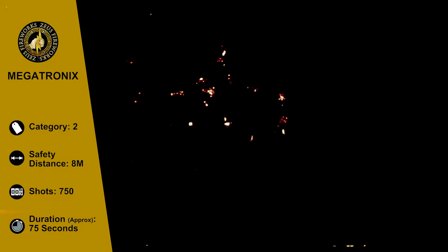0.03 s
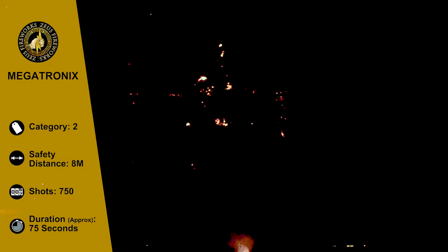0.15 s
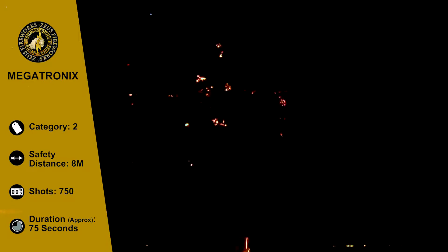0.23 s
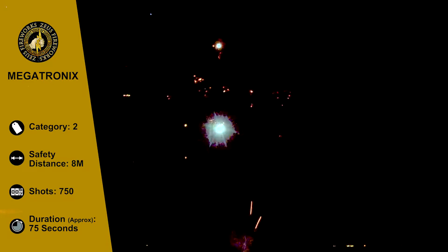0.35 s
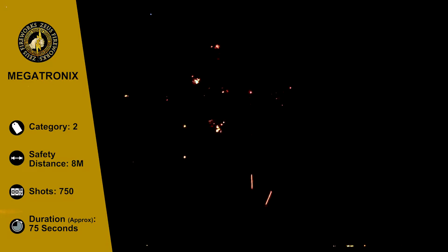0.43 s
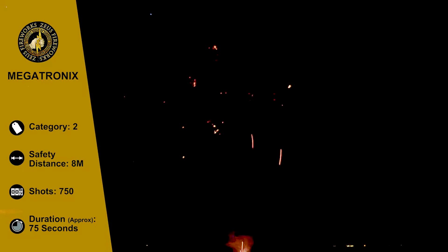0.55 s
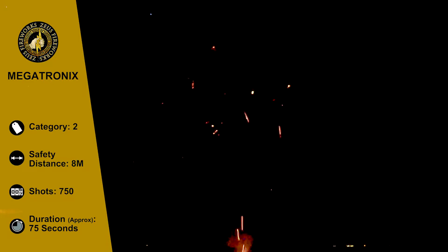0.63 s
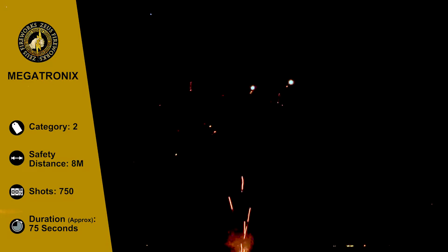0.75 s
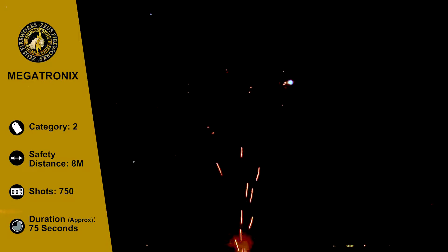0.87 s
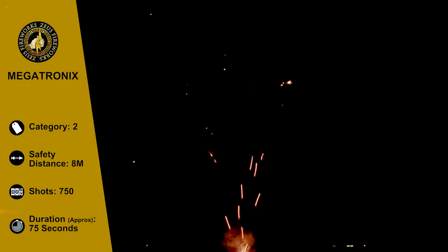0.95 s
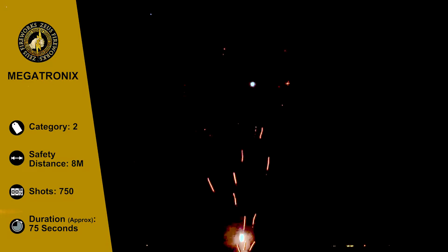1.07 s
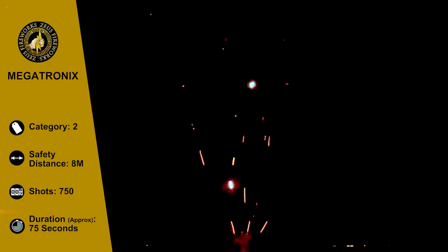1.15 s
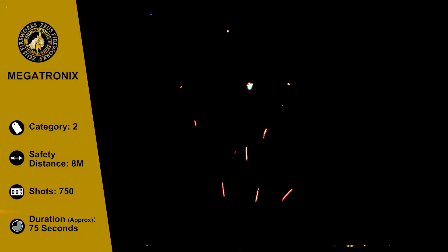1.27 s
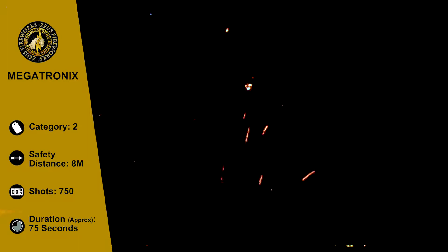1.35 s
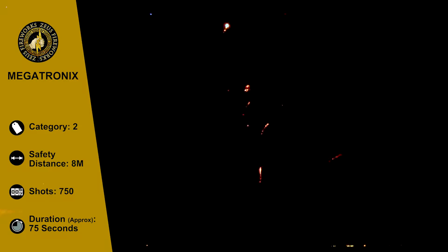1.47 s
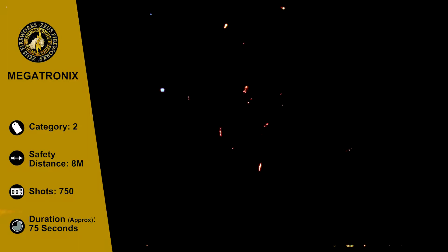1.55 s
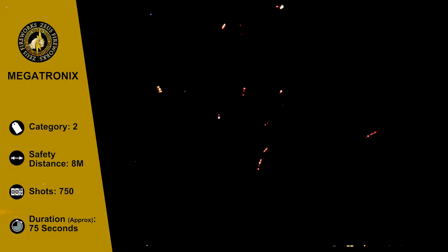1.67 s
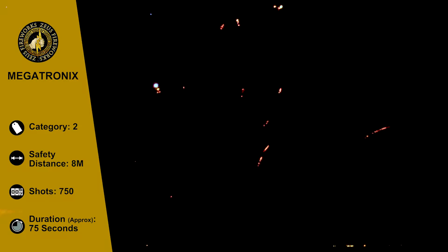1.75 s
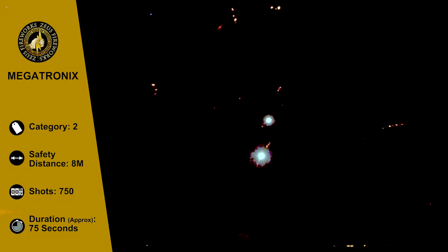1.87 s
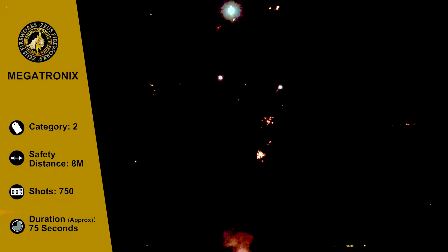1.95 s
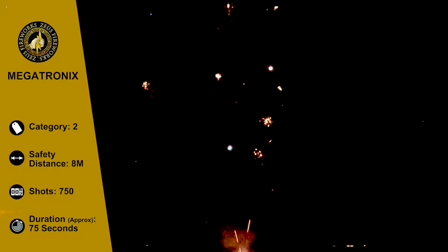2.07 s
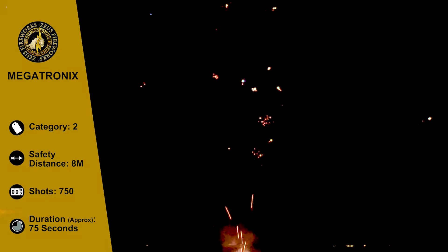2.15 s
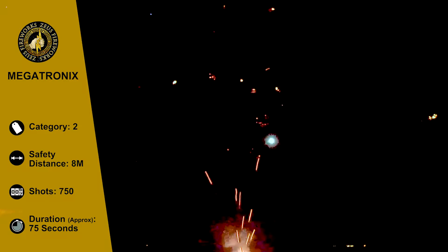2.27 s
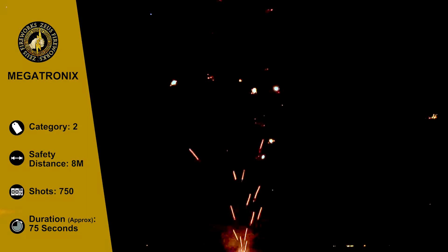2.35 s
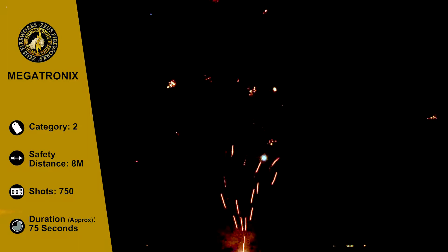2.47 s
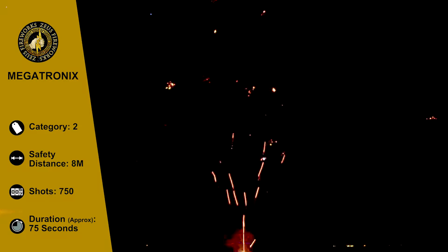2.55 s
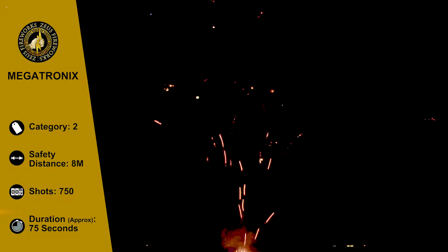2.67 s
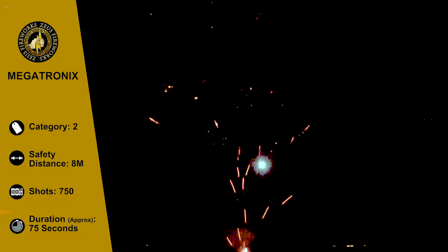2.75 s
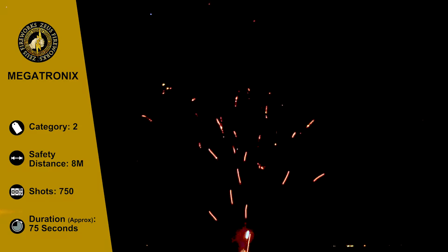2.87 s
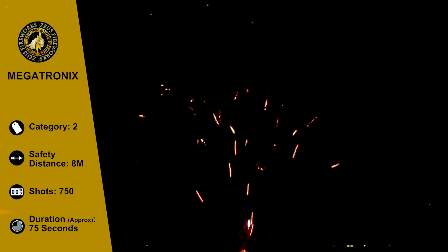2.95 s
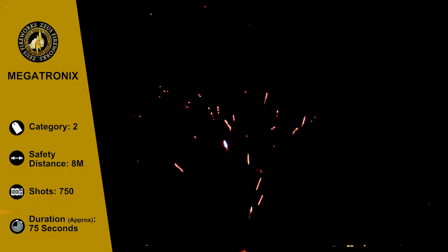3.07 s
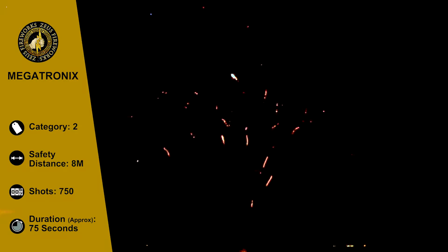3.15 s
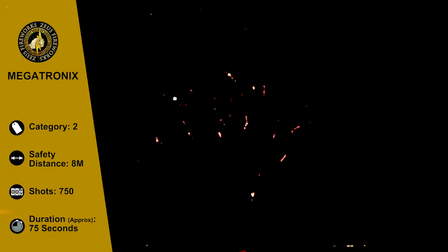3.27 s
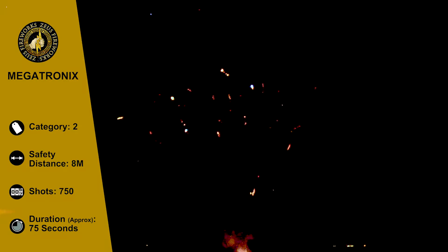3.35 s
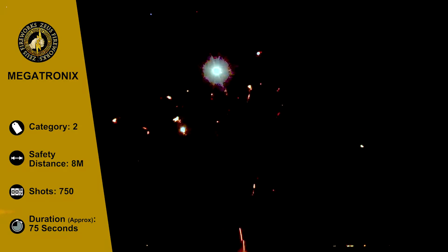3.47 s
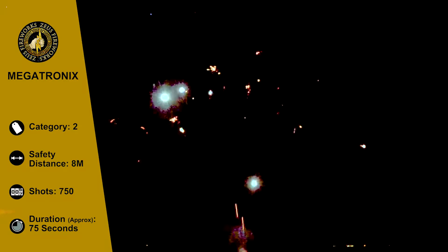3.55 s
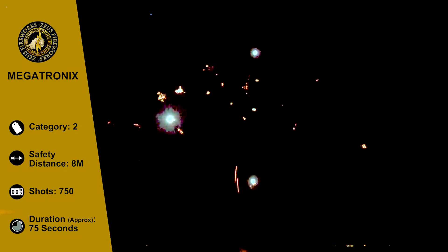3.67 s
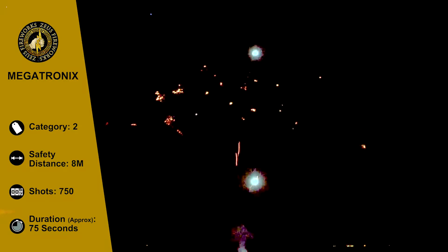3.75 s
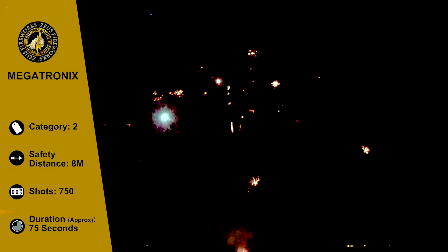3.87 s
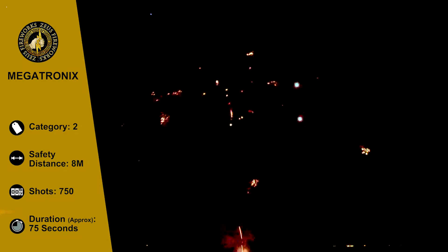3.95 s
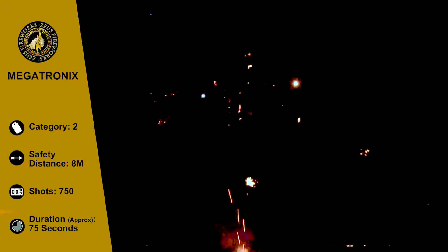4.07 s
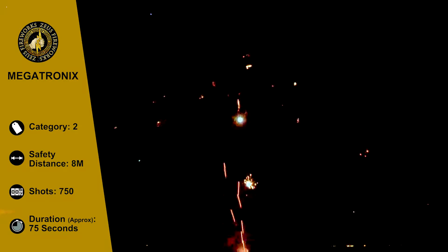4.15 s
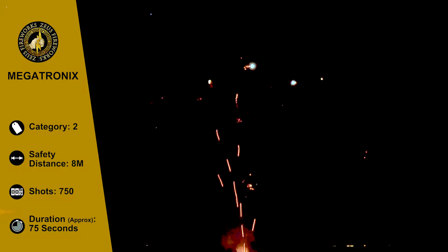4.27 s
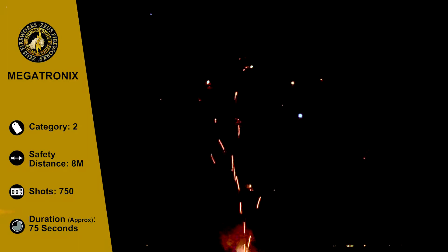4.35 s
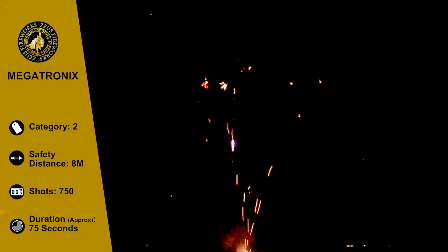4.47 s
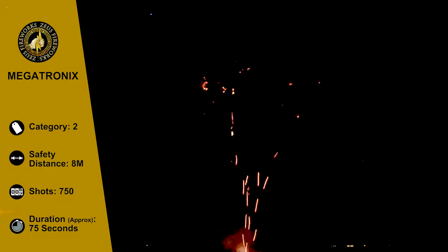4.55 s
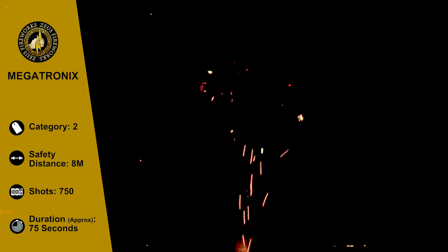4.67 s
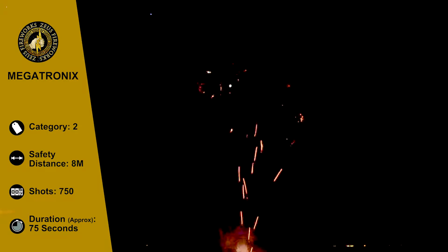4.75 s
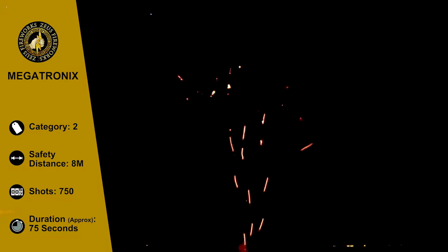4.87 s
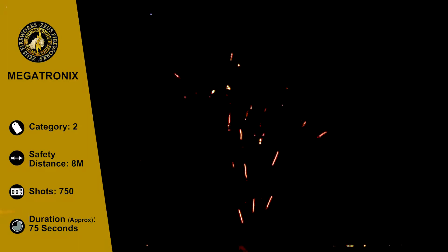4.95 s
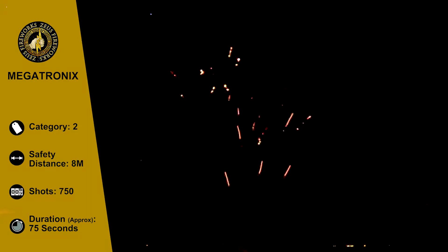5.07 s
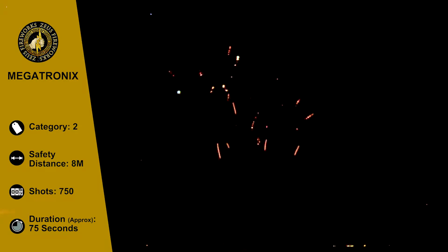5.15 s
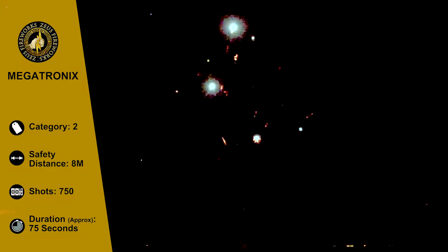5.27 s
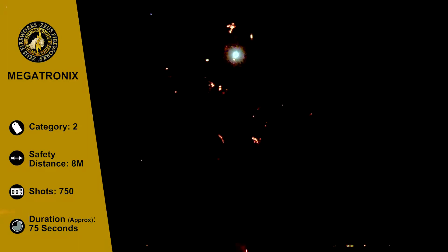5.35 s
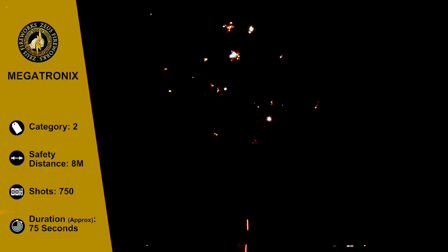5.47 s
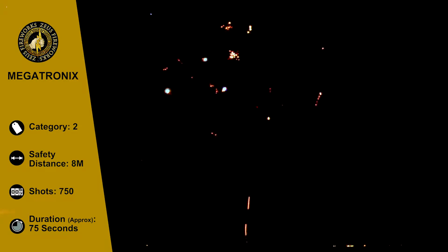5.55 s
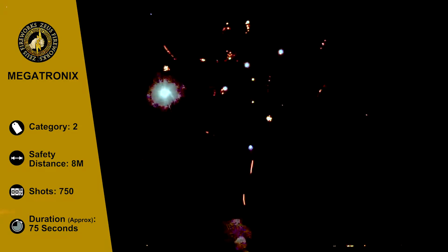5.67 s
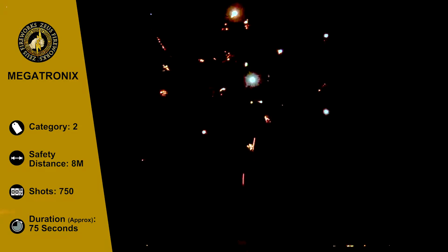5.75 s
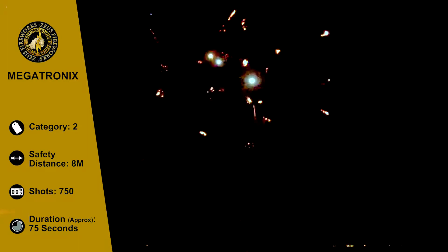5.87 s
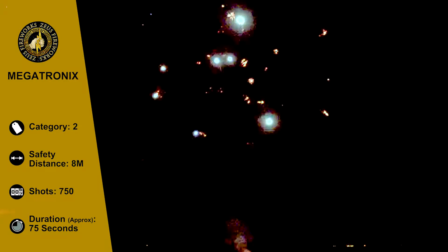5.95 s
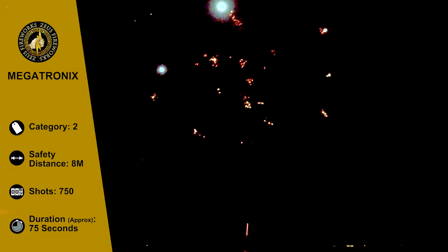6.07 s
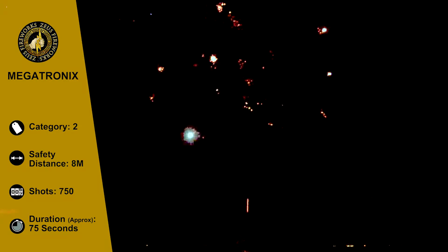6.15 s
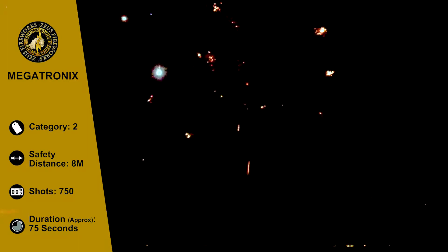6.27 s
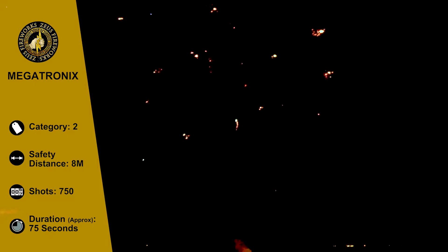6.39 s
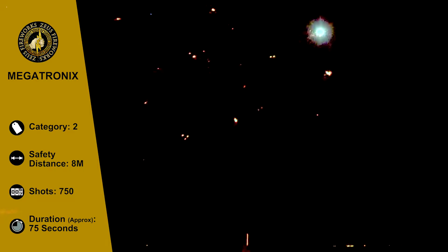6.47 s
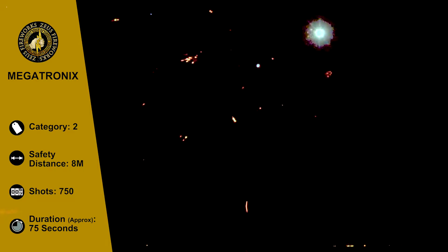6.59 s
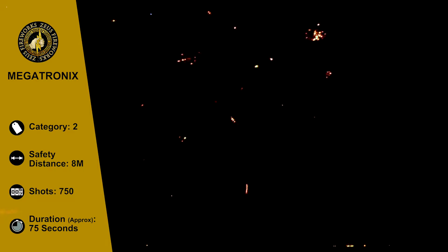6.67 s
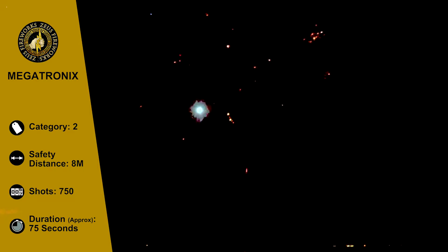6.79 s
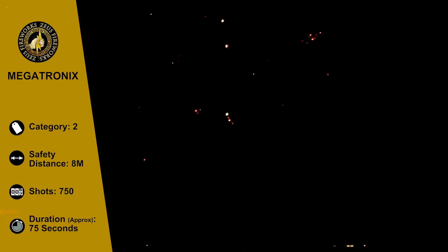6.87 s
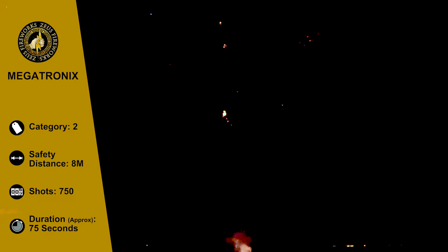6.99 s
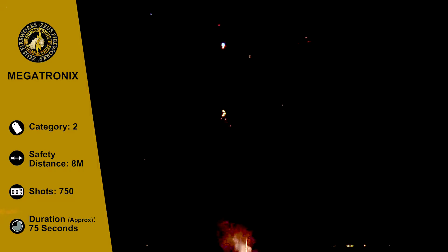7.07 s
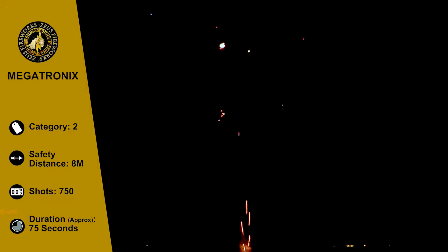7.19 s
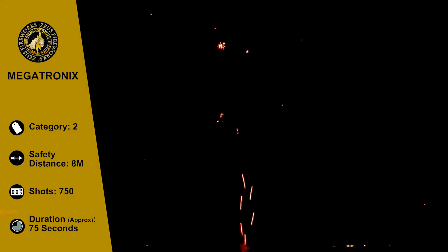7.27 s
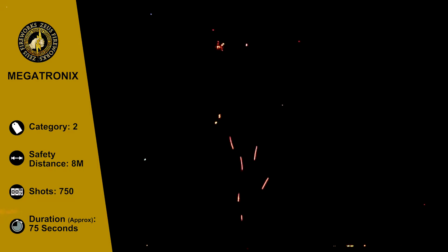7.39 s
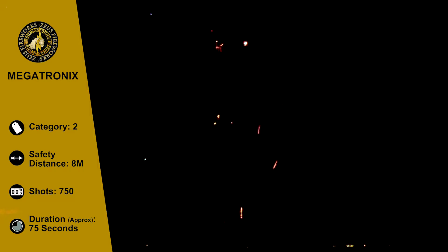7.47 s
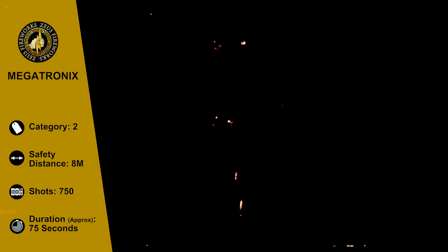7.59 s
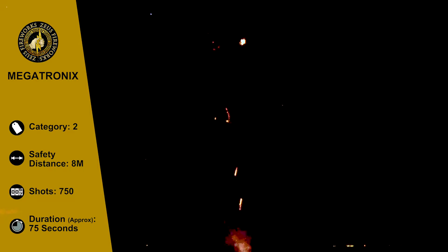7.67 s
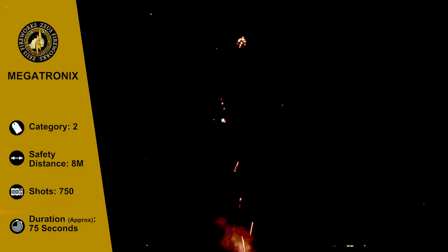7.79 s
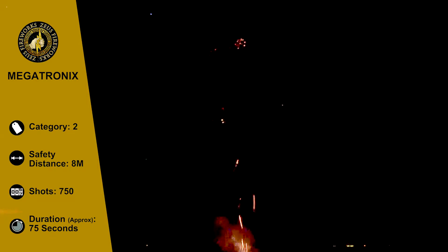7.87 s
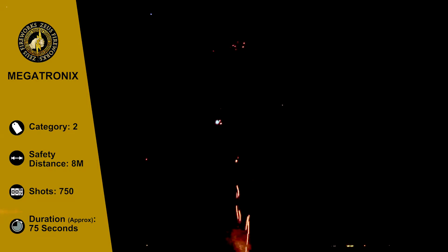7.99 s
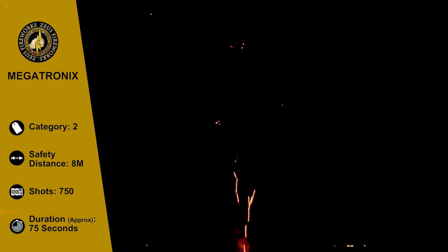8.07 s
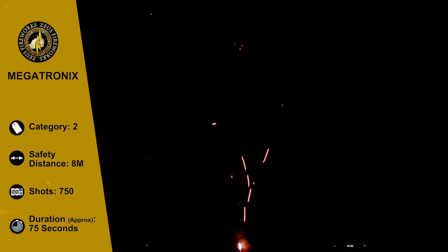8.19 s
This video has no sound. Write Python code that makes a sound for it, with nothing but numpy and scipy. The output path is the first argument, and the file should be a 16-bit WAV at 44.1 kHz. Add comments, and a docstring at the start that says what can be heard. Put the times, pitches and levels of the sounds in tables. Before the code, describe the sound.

Fireworks launch in rapid salvos with shrill, wavering whistles and sharp cracks bursting overhead in the open night air.

```python
"""Whistling comets, fired in salvos from a fireworks cake in an open field at night.
Each lift charge thumps; the whistle mix lights with a falling squeal and shrills for half a second,
wavering and sinking over the hiss of its jet. Spent comets burst overhead with sharp cracks.
Distant trees return a thin wash over low night rumble."""
import sys
import numpy as np
from scipy import signal
from scipy.fft import rfft, irfft
from scipy.io import wavfile
from scipy.ndimage import uniform_filter1d

SR = 44100
rng = np.random.default_rng(int(sys.argv[2]) if len(sys.argv) > 2 else 0)


def wav_out(sig):
    """Save sig, one row per channel (or a flat mono array), as 16-bit PCM at SR to the path in sys.argv[1]."""
    wavfile.write(sys.argv[1], SR, np.round(np.clip(np.atleast_2d(sig).T, -1, 1) * 32767).astype(np.int16))


N = 362943

# lift charges: start_s, level_db
LIFTS = [(0.33, -31.5), (0.37, -26), (0.687, -24), (0.728, -19.5), (0.765, -26), (0.79, -27.5),
         (0.836, -21), (0.87, -25), (0.905, -26.5), (0.95, -21.5), (0.998, -22.5), (1.02, -28), (1.05, -30),
         (1.102, -30), (1.126, -24), (1.172, -23.5), (1.203, -32), (2.115, -29), (2.156, -21), (2.197, -28),
         (2.242, -24), (2.294, -29), (2.328, -25), (2.35, -23.5), (2.394, -22), (2.423, -26),
         (2.438, -29.5), (2.484, -29), (2.518, -28), (2.563, -30), (2.599, -27), (2.647, -23), (2.696, -29),
         (2.754, -33), (2.783, -31), (2.824, -28.5), (2.862, -29), (2.89, -24), (2.938, -36), (2.986, -32),
         (3.552, -29), (3.589, -25), (4.029, -26), (4.088, -23), (4.137, -24), (4.208, -27), (4.246, -21.5),
         (4.297, -21.5), (4.333, -36), (4.395, -27), (4.429, -27), (4.453, -24), (4.486, -26), (4.535, -29),
         (4.558, -34), (4.584, -28), (4.61, -23.5), (4.634, -25.5), (4.7, -28), (4.755, -35), (4.782, -32),
         (4.815, -32), (4.86, -34), (4.909, -28), (4.954, -38), (5.506, -29), (5.591, -30), (6.116, -23),
         (6.56, -24), (7.181, -23), (7.22, -21), (7.246, -21), (7.277, -19.5), (7.322, -22), (7.346, -24),
         (7.864, -19.5), (7.891, -26.5), (7.917, -20), (7.943, -28), (7.99, -24), (8.014, -36),
         (8.043, -22), (8.081, -42), (8.127, -30), (8.195, -28.5)]
IGNITION_DELAY_S = .015


def amp(db):
    """dB to gain."""
    return np.exp(np.asarray(db) * np.log(10) / 20)


def rms_one(x):
    """Scale to rms 1."""
    return x / np.sqrt(np.mean(x ** 2) + 1e-20)


def drift(rate_hz, size):
    """Low-passed random wander, spread 1."""
    hop, settle = 20, 400
    pole = np.exp(-2 * np.pi * hop * rate_hz / SR)
    noise = rng.standard_normal(size // hop + settle + 2)
    slow = signal.lfilter([(1 - pole) ** 2], [1, -2 * pole, pole * pole], noise)[settle:]
    return np.interp(np.arange(size) / hop, np.arange(len(slow)), slow / np.sqrt((1 - pole) / 4))


def coloured(spectrum):
    """Steady noise of a given spectrum, rms 1."""
    hz, db = np.transpose(spectrum)
    bins_hz = np.maximum(np.fft.rfftfreq(N, 1 / SR), 1)
    gain = amp(np.interp(np.log(bins_hz), np.log(hz), db))
    return rms_one(irfft(rfft(rng.standard_normal(N)) * gain, N))


def butter(x, order, hz, kind="low"):
    """Butterworth filter."""
    return signal.sosfilt(signal.butter(order, hz, kind, fs=SR, output="sos"), x)


def fade(size, ramp_s):
    """Linear ramps at both ends."""
    return np.clip(np.minimum(np.arange(size), np.arange(size)[::-1]) / (ramp_s * SR), 0, 1)


def add(out, start_s, sound):
    """Mix in at start_s."""
    i = max(round(start_s * SR), 0)
    out[i:i + len(sound)] += sound[:N - i]


def whistle(hz, edge_db=0, partials=None, waver=.00396, jitter=.00309, flutter_db=2.5, rasp_db=2.0):
    """Burning tube: pitch wavers, partials flutter, level rasps. Edge trades half steps for overtones."""
    # tube partials, half steps from strong-weak burning cycles: multiple, level_db
    tube_partials = [(.5, -41), (1, -1.5), (1.5, -32), (2, -19.5), (2.5, -28), (3, -26), (3.5, -28.5),
                     (4, -40), (4.5, -45), (5, -42.5), (6, -50)]
    size = len(hz)
    wavering_hz = hz * (1 + waver * drift(20.5, size) + jitter * drift(72.7, size))
    phase = 2 * np.pi * (np.cumsum(wavering_hz) / SR + rng.random())
    tone = np.zeros(size)
    for multiple, level_db in partials or tube_partials:
        tilt_db = edge_db * ((multiple >= 2) - (multiple in (.5, 1.5)))
        swing_db = (1 if multiple == 1 else 2) * flutter_db * drift(25, size)
        tone += amp(level_db + tilt_db + swing_db) * np.sin(multiple * phase)
    return np.sqrt(2) * amp(rasp_db * drift(98, size)) * tone


def burn_edge_db(size):
    """The screech sharpens as the mix burns down the tube."""
    return np.linspace(-7, -.5, size)


def solo_comets(climb_s=.035, catch_db=-5, catch_s=.033, tumble_db=2, flick_hz=2900, flick_s=.016):
    """Single whistles climb to pitch, glide, tumble and end in a high flick. Returns sound, power."""
    # comets: lit_s, spent_s, first_hz, last_hz, level_db, tumble_hz, crest_s, tumble_pct
    comets = [(-.3, 0.084, 2684, 2260, -15.5, 2, .04, 0.33), (-.2, 0.216, 2490, 2467, -19, 11.7, .043, 2.5),
              (0.342, 0.799, 2733, 2706, -19, 6, .526, 1.6),
              (0.385, 0.801, 2651, 2516, -16.5, 3.36, .45, 1.24),
              (1.193, 1.627, 2483, 2238, -18.5, 3.55, 1.398, 0.78),
              (1.22, 1.631, 2635, 2529, -22.5, 8.6, 1.515, 2.5),
              (2.851, 3.312, 2706, 2832, -18.5, 6.3, 3.11, 0.49),
              (2.999, 3.566, 2500, 2213, -20.5, 4.87, 3.36, 1.08),
              (2.95, 3.443, 2450, 2421, -17.5, 3.2, 3.204, 2.9),
              (3.561, 4.048, 2745, 2494, -18.5, 6.2, 3.5, 1.23),
              (3.604, 4.003, 2598, 2437, -18.5, 6.2, 3.2, 1.44),
              (4.044, 4.449, 2705, 2579, -17, 8, 4.261, 1.27),
              (4.973, 5.425, 2760, 2484, -21, 8.3, 5.138, 2.37),
              (4.92, 5.402, 2578, 2399, -20.5, 8.34, 5.178, 1.66),
              (4.878, 5.376, 2465, 2324, -19, 9.7, 5.142, 1.25),
              (5.519, 6.006, 2670, 2480, -17.5, 11, 5.77, 1.78),
              (5.608, 6.124, 2572, 2284, -19.5, 13.5, 5.885, 1.53),
              (6.132, 6.546, 2636, 2450, -18, 14.4, 6.355, 1.63),
              (6.573, 6.977, 2624, 2373, -18.5, 14.8, 7, 1.27),
              (7.195, 7.681, 2735, 2342, -15, 14.1, 7.46, 1.11),
              (7.261, 7.668, 2710, 2507, -16.5, 4.7, 7.479, 1.06),
              (7.295, 7.698, 2602, 2400, -18, 9, 7.52, 1.93),
              (7.879, 8.23, 2632, 2481, -18, 14.2, 8.039, 1.5)]
    out, power = np.zeros(N), np.zeros(N)
    flick_t = np.arange(0, flick_s, 1 / SR)
    for lit_s, spent_s, first_hz, last_hz, level_db, tumble_hz, crest_s, tumble_pct in comets:
        t = np.arange(max(lit_s, 0), spent_s, 1 / SR)
        age_s = t - lit_s
        turn = 2 * np.pi * tumble_hz * (t - crest_s)
        tumble = tumble_pct / 100 * (np.cos(turn) - .29 * np.sin(2 * turn))   # skewed pitch swing
        flat = .08 * np.exp(-age_s / climb_s)
        hz = np.interp(t, [lit_s, spent_s], [first_hz, last_hz]) * (1 - flat + tumble)
        swing_db = tumble_db * np.cos(turn - 2 * np.pi * .2)   # level lags pitch
        gain = amp(level_db + catch_db * np.exp(-age_s / catch_s) + swing_db) * fade(len(t), .0073)
        add(out, t[0], gain * whistle(hz, burn_edge_db(len(t))))
        add(power, t[0], gain ** 2)
        rise_hz = flick_hz + (hz[-1] - flick_hz) * np.exp(-4 * flick_t / flick_s)
        flick = np.hanning(len(flick_t)) * whistle(rise_hz, partials=[(.95, 0)])
        add(out, spent_s - flick_s / 4, amp(-28) * flick)
    return out, power


def jet_hiss(whistle_power, relative_db=-19):
    """Gas jets hiss in step with the whistles' power."""
    # jet spectrum: freq_hz, density_db
    spectrum = [(300, -27.5), (1200, -17), (2000, -5.5), (2600, 1.5), (3300, -7), (6000, -9),
                (10000, -14.5), (15500, -39)]
    envelope = np.sqrt(uniform_filter1d(whistle_power, size=600) + 1e-12)
    return amp(relative_db) * envelope * coloured(spectrum)


def night_rumble(wander_db=2.0):
    """Low rumble of night air, slowly swelling."""
    # air spectrum: freq_hz, density_db
    spectrum = [(20, -50), (40, -26), (60, -9), (150, 1), (300, -9.5), (600, -22), (2000, -24.5),
                (15500, -40)]
    # rumble envelope: time_s, level_db
    envelope = [(0, -43.5), (1, -48), (1.801, -44.5), (2.301, -44.5), (3.1, -49), (3.6, -38.5), (4.5, -42),
                (5.2, -51), (5.998, -42.5), (7.2, -41), (8.23, -46)]
    level_db = np.interp(np.arange(N) / SR, *np.transpose(envelope))
    return amp(level_db + wander_db * drift(.62, N)) * coloured(spectrum)


def tree_wash(near, level_db=-23.5, t60_s=1.78):
    """Countless weak echoes off distant trees: a dull noise tail."""
    t = np.arange(0, 2, 1 / SR)
    tail = rng.standard_normal(len(t)) * amp(-60 * t / t60_s) * np.clip(t / .0033, 0, 1)
    tail = butter(tail, 1, hz=3000)
    return amp(level_db) * signal.fftconvolve(near, tail / np.sqrt(np.sum(tail ** 2)))[:N]


def cracks(scatter_db=-22, scatter_s=.014, lesser_per_s=15):
    """Bursts: N-shaped shocks, longer ones blunter, with scatter and echoes. Lesser ones fill in."""
    # overhead bursts: time_s, level_db, shock_ms
    bursts = [(0.0696, -10, 0.24), (0.0901, -11, 0.22), (0.1242, -6, 0.22), (0.1656, -4.5, 0.21),
              (0.2913, -21, 0.12), (0.314, -15, 0.12), (0.4073, -12, 0.14), (0.4318, -2.5, 0.19),
              (0.492, 1, 0.2), (0.5864, -4, 0.22), (0.5919, -4, 0.16), (1.3471, -13, 0.15),
              (1.4174, -16, 0.49), (1.6944, -18.5, 0.21), (1.783, -31, 0.26), (1.894, -24, 0.23),
              (1.907, -25, 0.18), (2.0488, -16.5, 0.19), (2.0662, -19.5, 0.11), (2.084, -16, 0.24),
              (2.0947, -3.5, 0.15), (2.105, -10, 0.18), (2.1755, -2.5, 0.16), (2.2482, -3, 0.22),
              (2.278, -17, 0.43), (2.374, -8, 0.19), (2.5272, -7, 0.16), (2.6991, -10.5, 0.19),
              (2.7069, -6.5, 0.26), (3.3053, -7, 0.45), (3.487, -15, 0.17), (3.6478, -5.5, 0.18),
              (3.6846, -8.5, 0.22), (3.7778, -4, 0.21), (3.79, -10, 0.11), (3.8917, -9.5, 0.23),
              (3.974, -9.5, 0.27), (3.995, -5, 0.16), (4.0121, -5.5, 0.26), (4.028, -9.5, 0.25),
              (4.119, -4.5, 0.22), (4.1369, -6.5, 0.34), (4.2574, -2, 0.26), (4.3137, -6, 0.14),
              (4.346, -0.5, 0.19), (4.6534, -5.5, 0.16), (5.24, -6, 0.14), (5.406, -9.5, 0.2),
              (5.4402, -14, 0.23), (5.465, -19, 0.2), (5.4965, -10.5, 0.16), (5.5134, -7, 0.24),
              (5.5954, -5.5, 0.24), (5.6704, -8, 0.23), (5.8455, -3, 0.17), (5.9265, -10, 0.49),
              (5.9542, -7.5, 0.17), (6.0125, -11, 0.5), (6.0179, -7, 0.31), (6.0368, -4, 0.15),
              (6.0491, -13.5, 0.53), (6.0648, -6.5, 0.13), (6.0887, -16, 0.33), (6.1126, -17, 0.5),
              (6.127, -4, 0.21), (6.1633, -1, 0.16), (6.1995, -11, 0.18), (6.209, -10, 0.35),
              (6.245, -1.5, 0.18), (6.2746, -11, 0.13), (6.351, -12.5, 0.56), (6.3878, -7, 0.23),
              (6.441, -6, 0.15), (6.452, -10.5, 0.21), (6.5026, -20, 0.46), (6.5879, -3.5, 0.17),
              (6.5966, -13.5, 0.44), (6.6622, -1.5, 0.22), (6.7148, -2.5, 0.19), (6.7816, -2, 0.2),
              (7.05, -9.5, 0.19), (7.059, -18, 0.1), (7.1633, -20, 0.16), (7.283, -25, 0.59),
              (7.76, -19, 0.23), (7.956, -2, 0.18)]
    # ground and nearby reflections: delay_s, gain_db
    echoes = [(.0022, -24.5), (.0037, -22)]
    draws = rng.random((300, 3))
    random_s = np.cumsum(-np.log(draws[:, 0]) / lesser_per_s)
    lesser = np.transpose([random_s, -23 - 10 * draws[:, 1], .034 + .88 * draws[:, 2]])
    per_quarter_s = np.histogram(np.array(bursts)[:, 0], np.arange(0, 9, .25))[0]
    lesser = [row for row in lesser[random_s < N / SR] if per_quarter_s[int(row[0] * 4)] > 1]
    direct, t = np.zeros(N), np.arange(0, .04, 1 / SR)
    for time_s, level_db, shock_ms in [*bursts, *lesser]:
        shock_s = shock_ms / 1000
        shock = np.where(t < shock_s, 2 * t / shock_s - 1, 0)
        scatter = amp(scatter_db) * rng.standard_normal(len(t)) * np.exp(-t / scatter_s)
        crack = butter(shock + scatter, 1, hz=min(.494 / shock_s, 16000))
        add(direct, time_s - shock_s / 2, amp(level_db + 7.5) * crack)
    out = butter(direct, 2, hz=12000)   # air absorption
    reflected = butter(out, 1, hz=5000)
    for delay_s, gain_db in echoes:
        add(out, delay_s, amp(gain_db) * reflected)
    return out


def launches(thump_hz=404, top_hz=3256, end_hz=2431, fall_s=.00595, squeal_s=.021):
    """Hollow thump, tick and low puff from the tube, then a falling ignition squeal."""
    out = np.zeros(N)
    t, squeal_t = np.arange(0, .06, 1 / SR), np.arange(0, squeal_s, 1 / SR)
    thump = np.sin(2 * np.pi * thump_hz * t) * np.exp(-.5 * ((t - .0045) / .002) ** 2)
    swoop_hz = end_hz + (top_hz - end_hz) * np.exp(-squeal_t / fall_s)
    swell = (.3 + .7 * squeal_t / squeal_s) * fade(len(squeal_t), .004) / np.sqrt(2)
    pauses_s = np.diff(np.array(LIFTS)[:, 0], prepend=-1)
    for (start_s, level_db), pause_s in zip(LIFTS, pauses_s):
        uneven_db = 3 * rng.standard_normal()
        squeal_db = -7 if pause_s > .3 else -10 + uneven_db   # clearer after a pause
        noise = rng.standard_normal(len(t))
        tick = amp(9.5) * np.exp(-t / .0025) * butter(noise, 2, hz=3500)
        puff = amp(-7.5) * np.exp(-t / .025) * rms_one(butter(noise, 2, hz=[120, 450], kind="band"))
        add(out, start_s, amp(level_db - 2.5) * (thump + tick + puff))
        hz = swoop_hz * (1 + .018 * rng.standard_normal())
        squeal = whistle(hz, partials=[(1, .029), (2, -21.5)], jitter=.01, rasp_db=2.1)
        add(out, start_s + IGNITION_DELAY_S, amp(squeal_db) * swell * squeal)
    return out


def salvos(detune=.025, swell_db=.5, tumble_hz=13, tumble_depth=.0118):
    """One detuned, tumbling comet per lift, blended under the salvo's level. Returns sound, power."""
    # one envelope per salvo: time_s, level_db
    envelopes = [
        [(.76, -15), (.9, -10.5), (1.1, -11.5), (1.34, -13)],
        [(2.16, -17.5), (2.3, -11), (2.6, -10.5), (2.85, -12.5), (3.05, -14.5), (3.2, -15.5)],
        [(4.18, -13), (4.3, -13), (4.55, -10), (4.8, -12), (5.0, -12), (5.2, -19)],
        [(7.92, -14), (8.1, -13), (8.23, -9.5)],
    ]
    # a comet's glide: age_s, pitch_hz
    glide = [(0, 2600), (.06, 2700), (.2, 2600), (.45, 2380), (0.478, 2420), (.5, 2880)]
    crowd, crowd_power, level = np.zeros(N), np.full(N, 1e-3), np.zeros(N)
    age_s, pitch_hz = np.transpose(glide)
    t = np.arange(0, age_s[-1], 1 / SR)
    for start_s, _ in LIFTS:
        if not any(rows[0][0] - age_s[-1] < start_s < rows[-1][0] for rows in envelopes):
            continue
        tumble = np.sin(2 * np.pi * (tumble_hz * t + rng.random()) + 1.48 * drift(6.04, len(t)))
        hz = np.interp(t, age_s, pitch_hz) * (1 + detune * rng.standard_normal() + tumble_depth * tumble)
        gain = amp(swell_db * drift(20, len(t))) * fade(len(t), .025)
        add(crowd, start_s + IGNITION_DELAY_S, gain * whistle(hz, burn_edge_db(len(t))))
        add(crowd_power, start_s + IGNITION_DELAY_S, gain ** 2)
    for rows in envelopes:
        time_s, level_db = np.transpose(rows)
        span_s = np.arange(time_s[0], time_s[-1] + .05, 1 / SR)
        add(level, time_s[0], amp(np.interp(span_s, time_s, level_db)) * fade(len(span_s), .013))
    return level * crowd / np.sqrt(uniform_filter1d(crowd_power, size=2000)), level ** 2


def stray_squeaks():
    """Oddly burning comets: short glides without overtones."""
    # squeaks: start_s, length_s, first_hz, last_hz, level_db
    squeaks = [(1.474, 0.038, 2880, 2800, -19), (1.52, .035, 2980, 3080, -32),
               (2.874, 0.075, 2997, 4354, -30), (3.298, 0.14, 2730, 2410, -17.5),
               (4.85, 0.028, 5700, 5510, -30), (5.29, 0.049, 3030, 3220, -29)]
    out = np.zeros(N)
    for start_s, length_s, first_hz, last_hz, level_db in squeaks:
        hz = np.linspace(first_hz, last_hz, round(length_s * SR))
        add(out, start_s, amp(level_db) * np.hanning(len(hz)) * whistle(hz, partials=[(1, 0)]))
    return out


def scene():
    """Fireworks, their wash and the night air; mono."""
    solo, solo_power = solo_comets()
    crowd, crowd_power = salvos()
    near = solo + crowd + jet_hiss(solo_power + crowd_power) + stray_squeaks() + launches() + cracks()
    return (near + night_rumble() + tree_wash(near))[None]


def record(dry):
    """Soft clip, then a steep low-pass."""
    stop_hz = 16200
    return signal.sosfilt(signal.cheby2(12, 60, stop_hz, fs=SR, output="sos"), np.tanh(dry))


dry = scene()
out = record(dry)
wav_out(out)
```